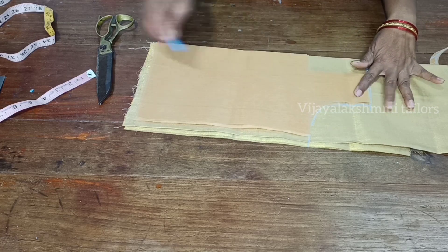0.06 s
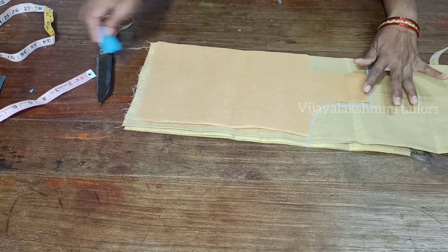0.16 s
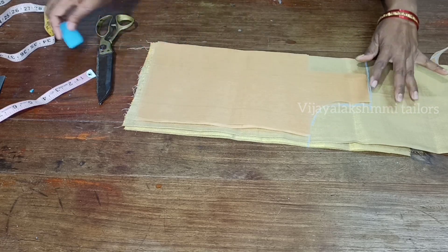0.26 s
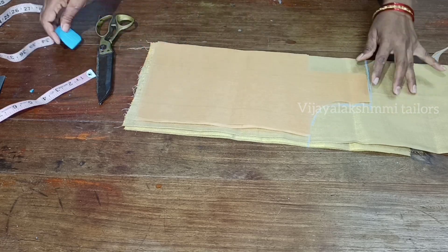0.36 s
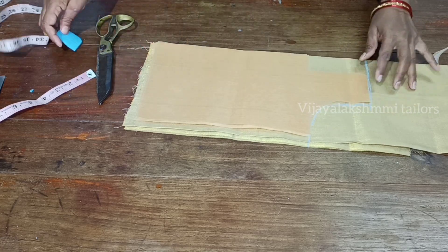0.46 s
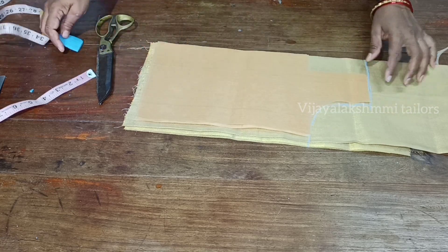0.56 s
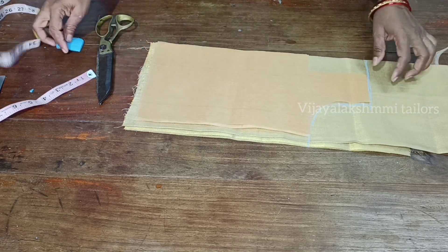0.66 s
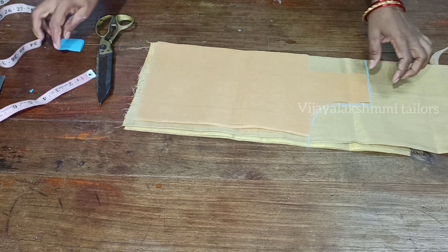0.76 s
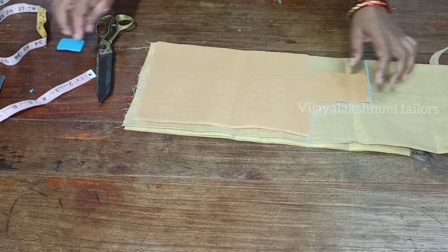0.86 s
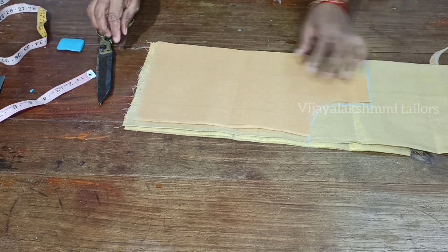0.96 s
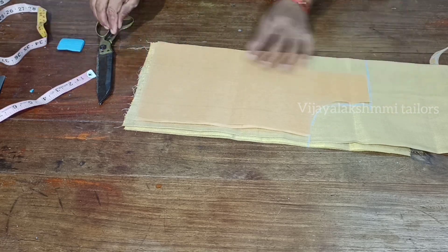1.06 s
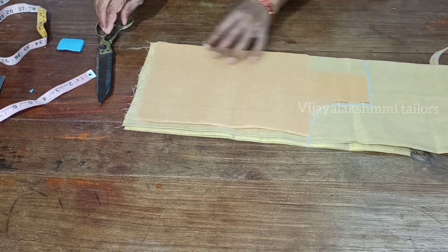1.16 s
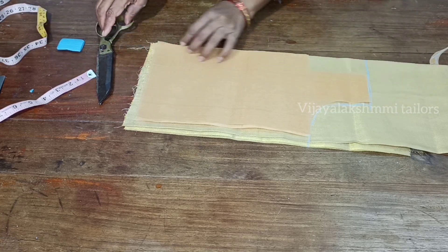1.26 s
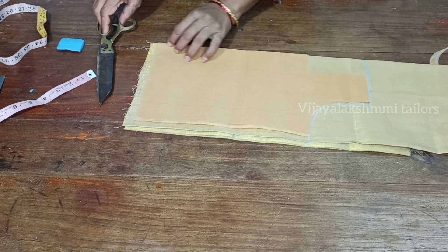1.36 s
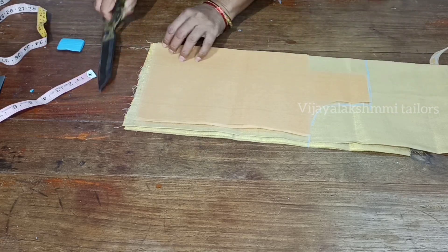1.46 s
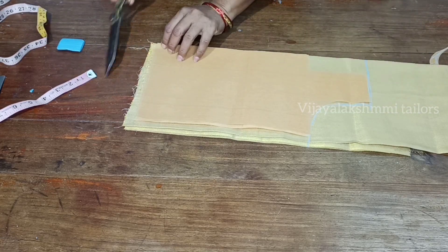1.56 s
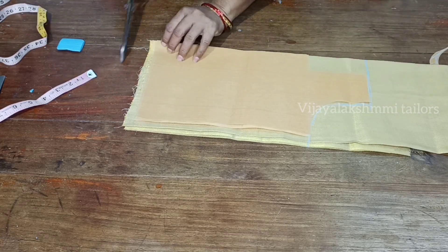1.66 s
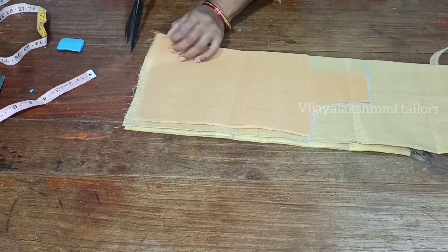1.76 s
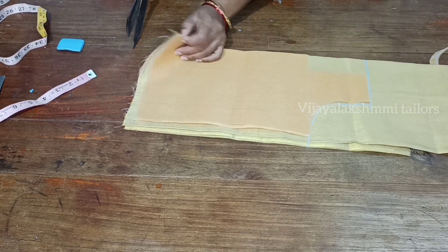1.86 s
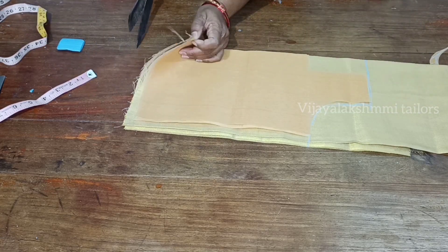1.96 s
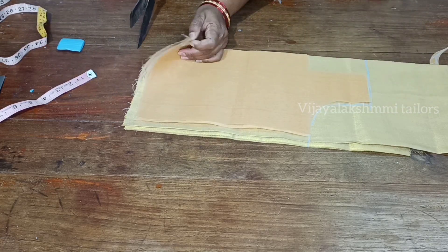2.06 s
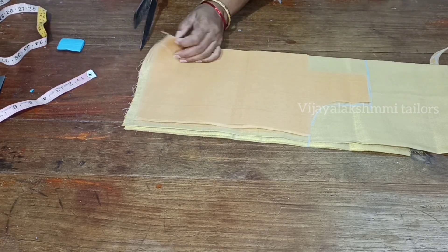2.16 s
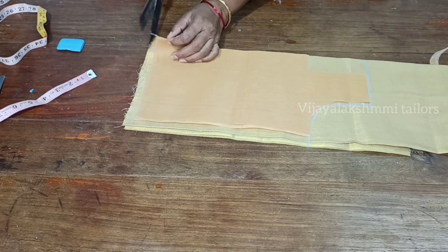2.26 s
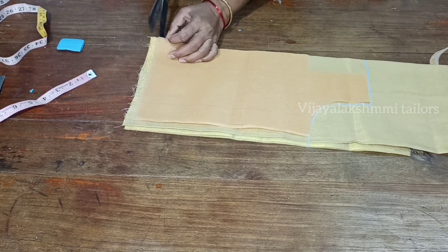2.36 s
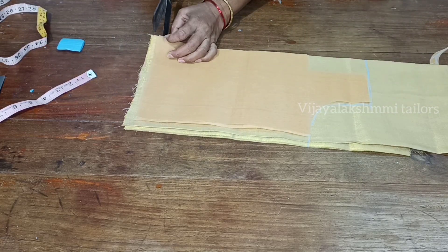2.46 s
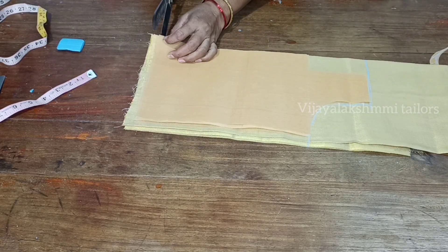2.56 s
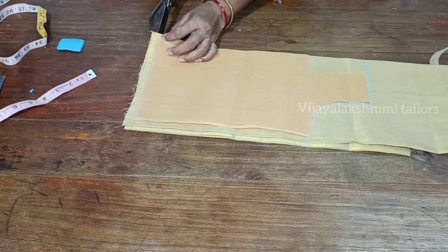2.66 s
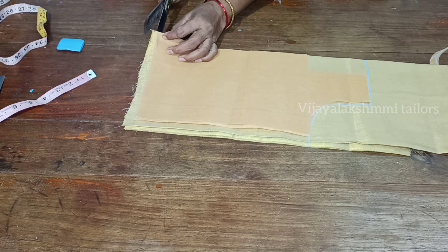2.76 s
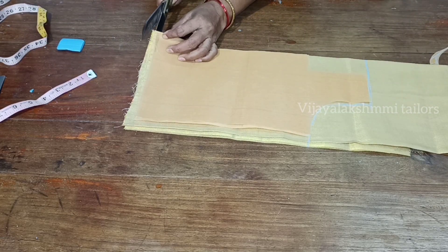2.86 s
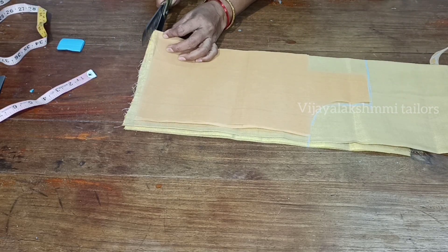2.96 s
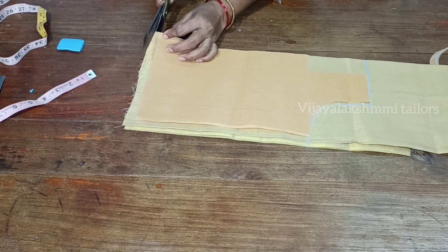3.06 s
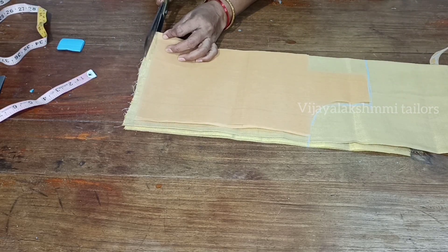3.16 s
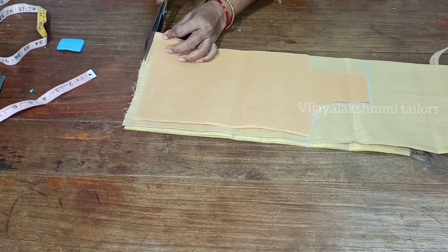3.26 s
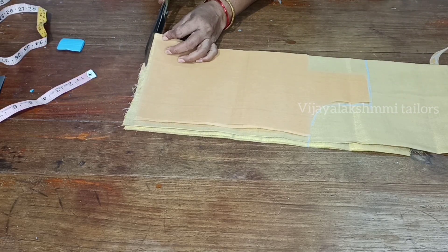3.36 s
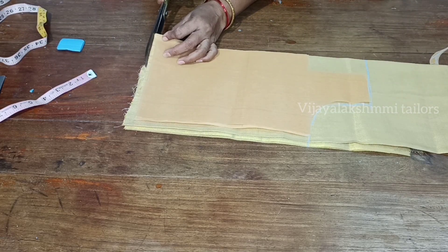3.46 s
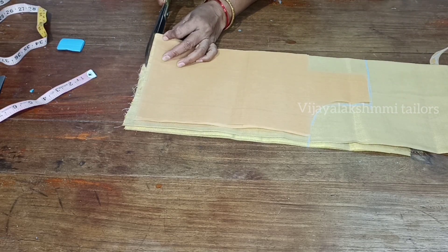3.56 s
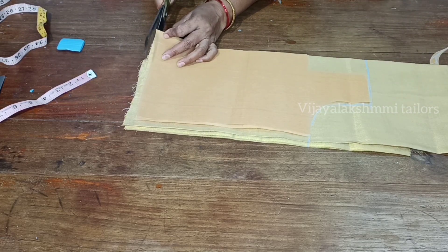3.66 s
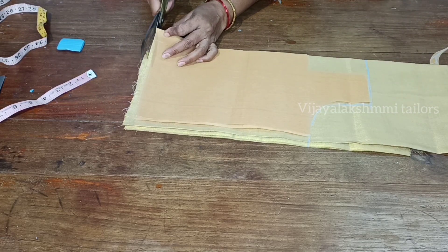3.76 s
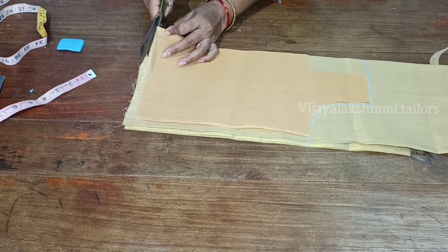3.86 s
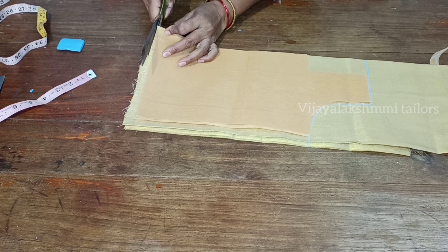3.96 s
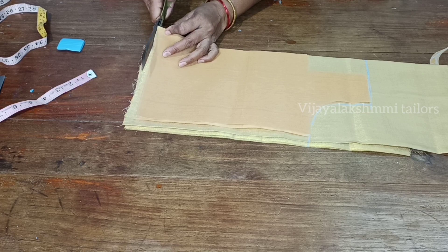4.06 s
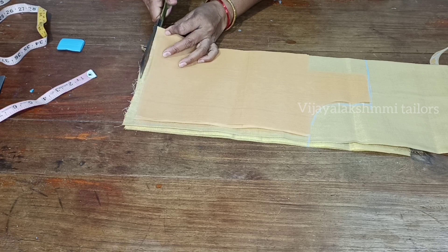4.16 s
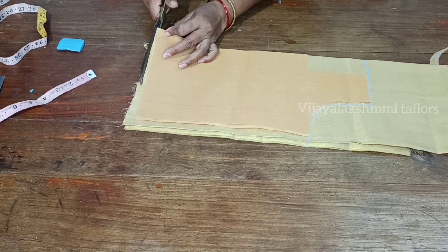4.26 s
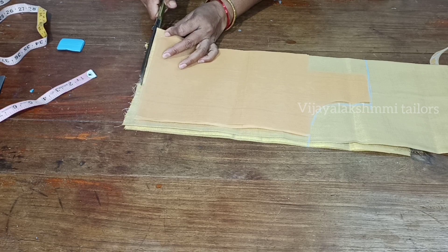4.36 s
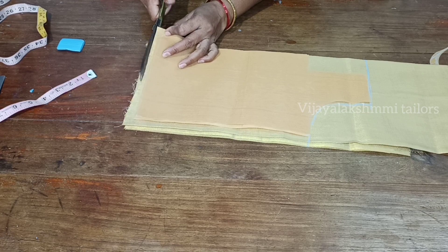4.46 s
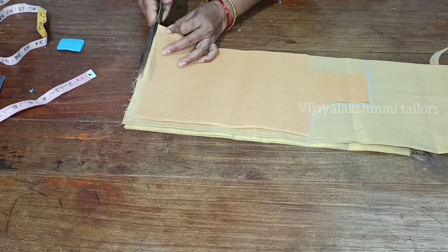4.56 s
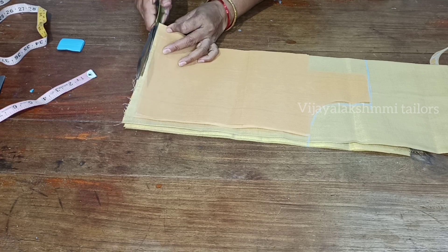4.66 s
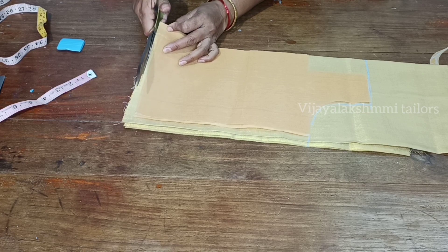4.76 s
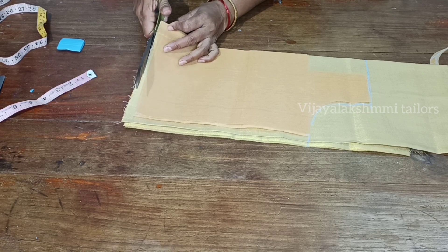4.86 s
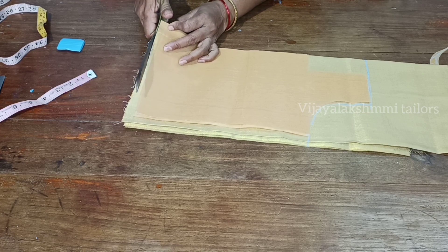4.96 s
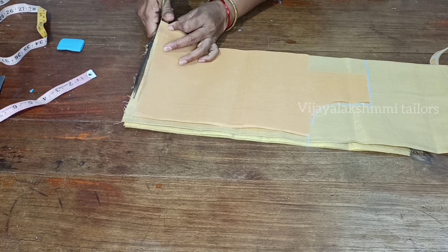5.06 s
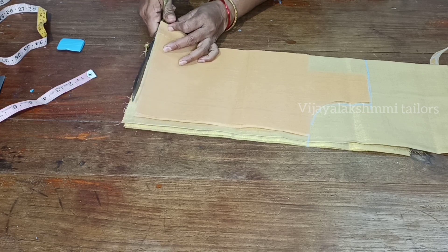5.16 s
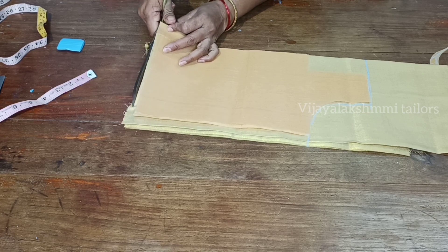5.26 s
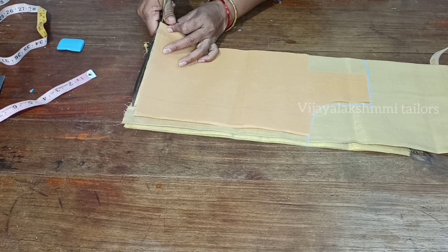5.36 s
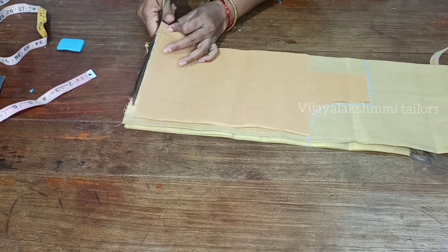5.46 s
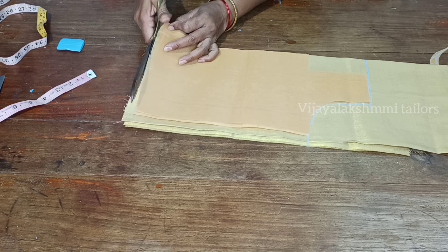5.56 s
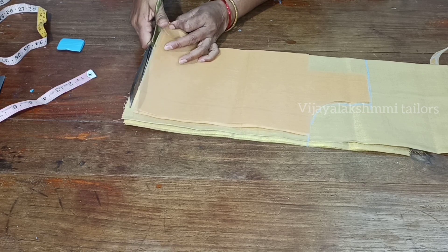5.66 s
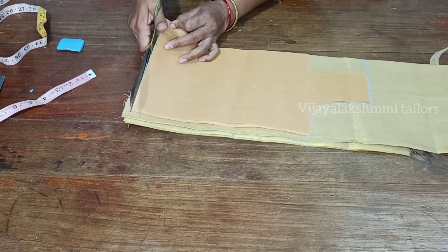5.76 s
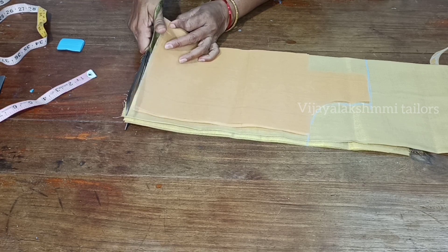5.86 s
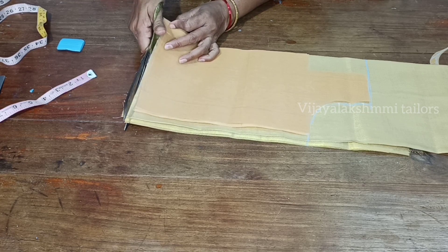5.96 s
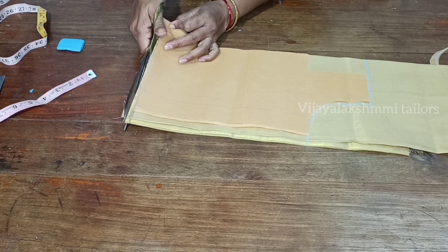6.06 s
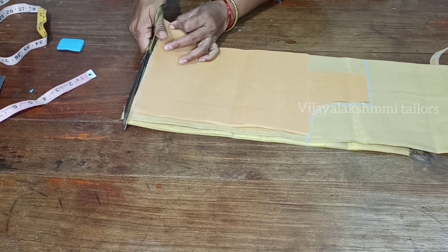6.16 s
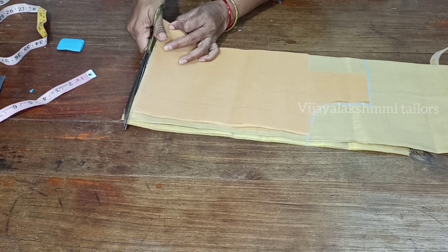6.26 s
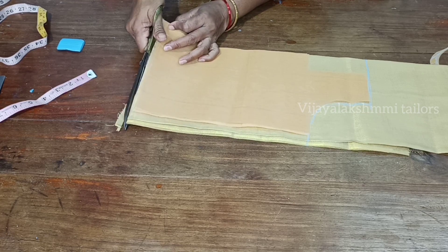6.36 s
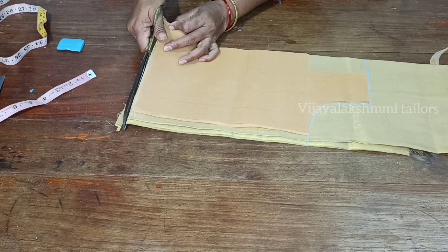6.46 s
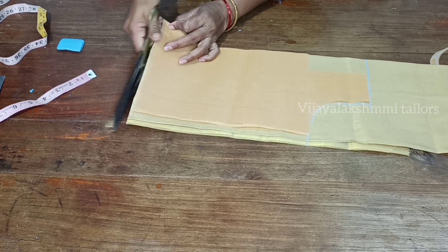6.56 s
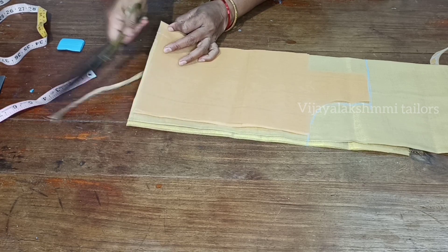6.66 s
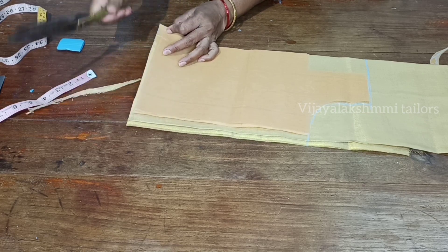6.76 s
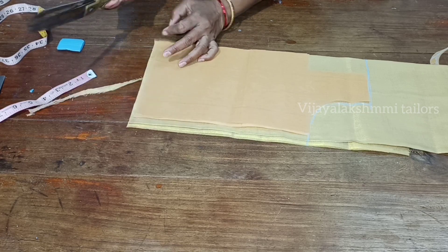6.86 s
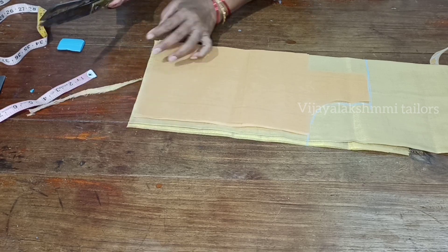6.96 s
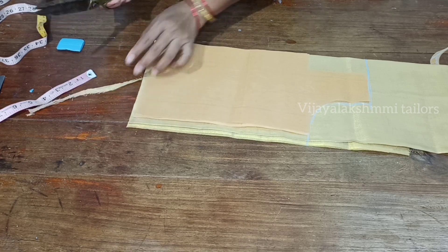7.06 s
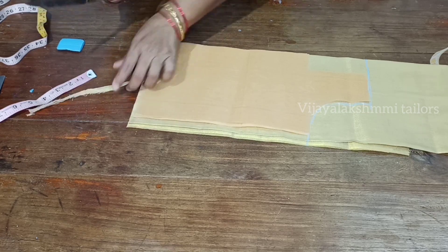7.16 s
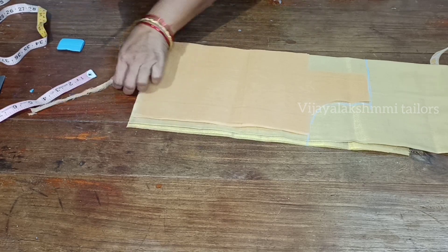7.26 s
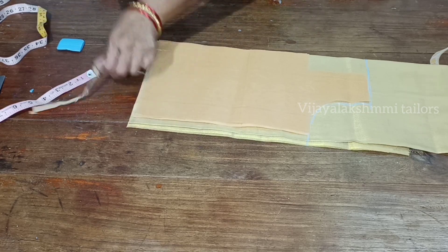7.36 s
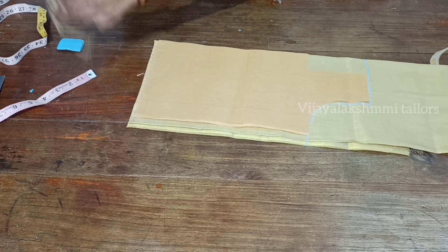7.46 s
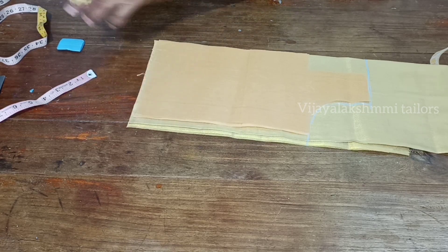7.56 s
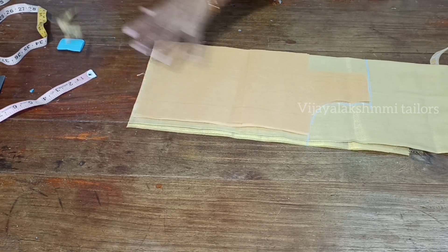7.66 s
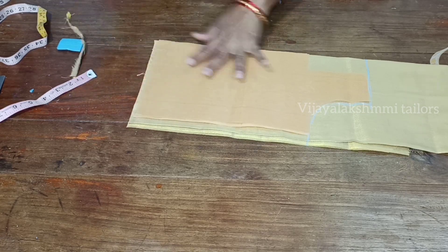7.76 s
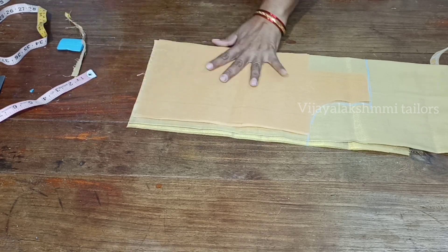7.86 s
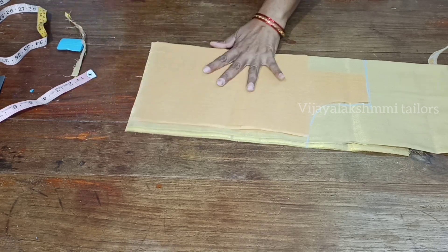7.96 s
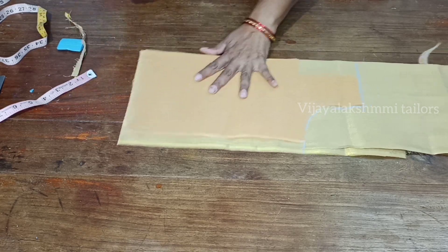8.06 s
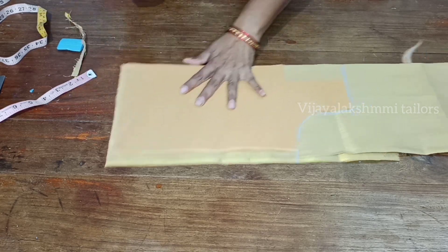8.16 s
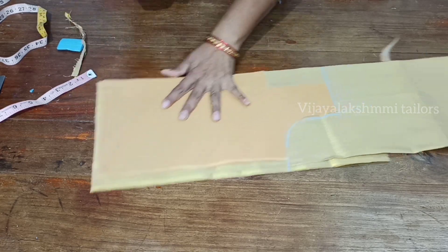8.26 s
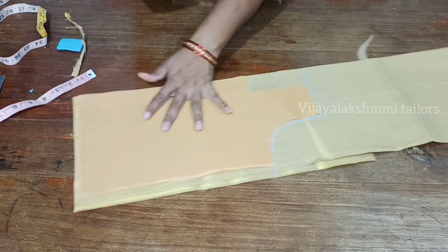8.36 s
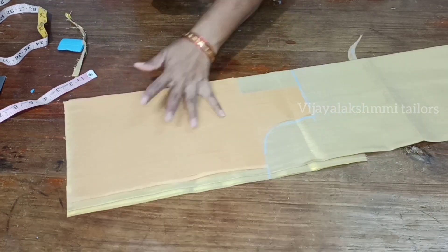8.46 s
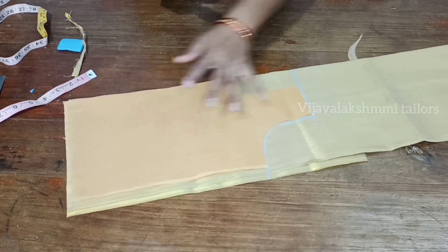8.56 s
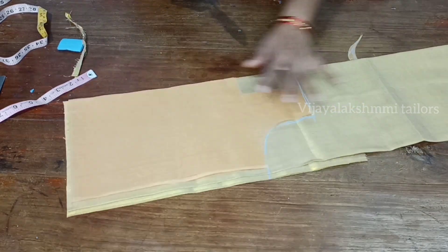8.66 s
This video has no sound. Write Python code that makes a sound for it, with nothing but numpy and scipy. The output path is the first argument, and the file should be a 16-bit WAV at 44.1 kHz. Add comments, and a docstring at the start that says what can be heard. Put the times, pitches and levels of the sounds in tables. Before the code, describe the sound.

Close to a small microphone in a nearly silent room, chalk drops on a wooden table with a hard clack. Heavy shears scrape and knock while glass bangles clink. Four slow, jerky cuts crunch through layered cloth, separated by short wooden scrapes and bangle ticks. The last ends in a loud snap, followed by jingling bangles, light brushing and fabric dragged over the table.

```python
"""A wooden table in a nearly silent room, heavy shears at work close to a small microphone. The shears scrape
along the top, bite through folded cloth in jerks and knock the wood, which carries most of the sound: grainy
noise drives the modes of the table and the boom of its panel. Glass bangles clink and chatter on both wrists
as mode banks struck by tiny touches. Cloth hisses, bright clicks tick, blades sing: noise under level curves."""
import sys
import numpy as np
from scipy import signal
from scipy.fft import rfft, irfft, next_fast_len
from scipy.io import wavfile
from scipy.ndimage import uniform_filter1d, map_coordinates

SR = 44100
rng = np.random.default_rng(int(sys.argv[2]) if len(sys.argv) > 2 else 0)


def master_out(mix):
    """Clip the mix to full scale and print it as 16-bit PCM to the path in sys.argv[1]."""
    frames = np.transpose(np.atleast_2d(mix))
    ceiling = np.clip(frames, -1, 1)
    pcm = np.round(ceiling * 32767).astype(np.int16)
    wavfile.write(sys.argv[1], SR, pcm)


N = 384111


def amp(db):
    """dB to amplitude."""
    return 10 ** (np.asarray(db) / 20)


def unit(x):
    """Scales to an RMS of 1."""
    return x / np.sqrt(np.mean(x ** 2) + 1e-20)


def along(points, hz):
    """Interpolates (f/Hz, value) points on a log frequency axis."""
    f, v = np.transpose(points)
    return np.interp(np.log(hz + 1), np.log(f + 1), v)


def curves(rows):
    """One dB value per sample for each column after the time; -150 dB outside the rows."""
    s, *cols = np.transpose(rows)
    return [np.interp(np.arange(N) / SR, s, c, -150, -150) for c in cols]


def filtered(x, response):
    """Multiplies the spectrum of x by a response of frequency."""
    m = next_fast_len(len(x) + 4096)
    return irfft(rfft(x, m) * response(np.fft.rfftfreq(m, 1 / SR)), m)[:len(x)]


def colour(spectrum):
    """Turns (f/Hz, level/dB) points into a response."""
    return lambda hz: amp(along(spectrum, hz))


def grit(spread_db, grain_s, count=N):
    """Noise made of short grains of uneven size."""
    knots = rng.standard_normal(int(count / SR / grain_s) + 4)
    swell = map_coordinates(knots, [np.arange(count) / SR / grain_s])
    return amp(spread_db * swell) * rng.standard_normal(count)


def patchy(x, patchy_db, size):
    """Random islands of gain over time and frequency, as the point of contact wanders; RMS 1."""
    z = signal.stft(x, nperseg=size)[2]
    field = uniform_filter1d(uniform_filter1d(rng.standard_normal(z.shape), 5, 0), 9, 1)
    return unit(signal.istft(z * amp(patchy_db * unit(field)), nperseg=size)[1][:N])


def add(track, s, sound):
    """Lays a sound into the track at s seconds."""
    part = track[round(s * SR):][:len(sound)]
    part += sound[:len(part)]


# room between the moves: f/Hz, level/dB
QUIET_SPECTRUM = [(25, -18.5), (50, -6.5), (123, -1.5), (206, -11), (1700, -25), (2480, -26), (4250, -30.5),
                  (16000, -33)]
QUIET_RMS_DB = -75


def quiet():
    """Faint, slowly wavering noise, strongest in the bass."""
    return amp(QUIET_RMS_DB) * unit(filtered(grit(spread_db=1.0, grain_s=0.23), colour(QUIET_SPECTRUM)))


# sway of the whole table under the cutting hand: t/s, level/dB
SWAY_LEVELS = [(3.1, -83), (3.43, -59.5), (3.88, -68.5), (4.05, -102), (4.4, -55.5), (5.05, -78),
               (5.33, -43), (5.45, -48.5), (5.83, -59.5), (5.89, -92), (6.3, -53), (6.69, -51), (6.96, -81),
               (7.35, -57), (7.5, -76)]
# deep colour of the sway: f/Hz, level/dB
SWAY_SPECTRUM = [(20, -37), (40, -12), (55, 1), (75, -4), (120, -57.5)]


def sway():
    """The table frame rocks slowly: deep noise under a level curve."""
    return amp(curves(SWAY_LEVELS)[0]) * unit(filtered(rng.standard_normal(N), colour(SWAY_SPECTRUM)))


# one mode of table or steel sings while something drags: start/s, stop/s, f/Hz, level/dB
HUM_EVENTS = [(1.48, 1.745, 166.6, -41.5), (1.496, 1.6, 2107, -44.5), (1.5, 1.72, 994, -37.5),
              (1.605, 1.67, 2386, -44), (1.76, 1.847, 594, -43.5), (1.85, 1.923, 1777, -46),
              (1.85, 1.92, 940, -40), (2.248, 2.35, 2135, -58), (2.28, 2.4, 1242, -55),
              (2.415, 2.523, 682, -45.5), (3.65, 3.852, 963, -43), (4.552, 4.803, 1018, -43),
              (5.54, 5.81, 937, -40.5), (7.798, 7.856, 686, -62.5), (7.949, 8.035, 1420, -40),
              (7.946, 8.016, 2456, -45.5), (8.411, 8.533, 235.5, -46.5)]
HUM_HALF_WIDTH_RATIO, HUM_EDGE_S, HUM_SAG_DB = .06, 0.034, -4.5  # half width over pitch; sag start to stop


def hums():
    """Dragging excites single modes: narrow noise, sagging until the drag stops."""
    out = np.zeros(N)
    for start, stop, hz, db in HUM_EVENTS:
        edges = [(start - HUM_EDGE_S / 8, db - 18), (start, db),
                 (stop, db + HUM_SAG_DB), (stop + HUM_EDGE_S, db - 26.5)]
        level = amp(curves(edges)[0])
        mode = lambda f: 1 / (1 + ((f - hz) / (HUM_HALF_WIDTH_RATIO * hz)) ** 2)
        out += level * unit(filtered(rng.standard_normal(N), mode))
    return out


# short bright clicks (threads, grit, sharp edges of clinks and hits): t/s, level/dB
CLICK_EVENTS = [(.574, -66), (1.4966, -41.5), (2.431, -57), (3.4064, -39.5), (3.4509, -40), (3.4865, -41.5),
                (4.2379, -62), (4.351, -41), (4.392, -40), (4.9363, -62), (5.1254, -57), (5.3563, -33.5),
                (5.465, -60.5), (6.378, -29.5), (6.6659, -57), (7.254, -45), (7.6855, -53), (7.733, -38.5),
                (7.9459, -50)]
# bright colour of clicks and fibre crunches: f/Hz, level/dB
BRIGHT_SPECTRUM = [(2200, -9.5), (3000, -12), (4500, -13), (7000, 2.5), (12500, -3.5), (16000, -17.5)]
CLICK_RISE_S, CLICK_T60_S = 0.00084, 0.0088


def clicks():
    """Threads, grit and sharp edges of clinks and hits: bright noise swells for a moment and is gone."""
    level, t = np.zeros(N), np.arange(SR // 30) / SR - 4 * CLICK_RISE_S
    for s, db in CLICK_EVENTS:
        rise = np.exp(np.minimum(t, 0) / CLICK_RISE_S)
        add(level, s + t[0], amp(db - 60 * np.maximum(t, 0) / CLICK_T60_S) * rise)
    return level * unit(filtered(rng.standard_normal(N), colour(BRIGHT_SPECTRUM)))


JOSTLE_RAD, JOSTLE_STEP = .65, 105  # neighbours blur the pitch: random phase step, every so many samples


def chime(modes_hz, modes, touches, scatter_db, damped_s):
    """Touches ring every bangle mode at a new strength, until skin and neighbours damp it."""
    t = np.arange(SR // 4) / SR
    db, t60 = np.transpose(modes)[:, :, None]
    luck = rng.standard_normal((3, *db.shape))
    hz = np.c_[modes_hz] * (1 + 0.0023 * luck[0])  # like bangles differ slightly in pitch
    beat_hz = 35 * np.exp(0.56 * luck[2])
    beat = 1 + 0.62 * np.cos(2 * np.pi * beat_hz * t)  # oval rings split each mode in two
    steps = JOSTLE_RAD * rng.standard_normal((len(db), len(t) // JOSTLE_STEP)).cumsum(1)
    jostle = uniform_filter1d(steps.repeat(JOSTLE_STEP, 1), JOSTLE_STEP)
    decay = amp(db + scatter_db * luck[1] - 60 * t / t60 - 60 * t / damped_s)
    ring = decay * beat * np.sin(2 * np.pi * hz * t + jostle)
    return signal.fftconvolve(touches, ring.sum(0))


# bangles touching: t/s, relative levels of tick/dB, thick pair/dB, thin pair/dB
CLINK_EVENTS = [(0.0683, -43.5, -71, -62.5), (0.093, -38, -62.5, -75), (0.9882, -44.5, -79.5, -89),
                (1.272, -41, -64.5, -80), (1.3474, -44, -70, -44), (1.421, -49, -61, -59),
                (1.5826, -33, -53, -67), (1.7628, -34.5, -57, -59.5), (1.8428, -22, -56, -49.5),
                (1.938, -40.5, -73.5, -54), (1.965, -43.5, -73.5, -49.5), (2.0377, -38, -62, -53.5),
                (2.1211, -37.5, -60, -53), (2.2273, -40.5, -77, -55), (3.045, -62, -79, -100.5),
                (3.9051, -29, -58.5, -77), (4.802, -21.5, -48.5, -57.5), (4.931, -54, -78, -89),
                (5.7893, -26.5, -56.5, -61.5), (6.7395, -23.5, -52.5, -87.5), (6.9936, -27, -58.5, -54.5),
                (7.1009, -51, -73.5, -50.5), (7.1095, -42, -57.5, -40), (7.2524, -35, -66, -48),
                (7.3015, -33.5, -63.5, -39.5), (7.3353, -29.5, -60.5, -40.5), (7.3614, -22, -65.5, -45.5),
                (7.4844, -31, -55.5, -52), (7.5441, -39, -57.5, -49.5), (7.5623, -31, -52.5, -62.5),
                (7.6028, -34, -75.5, -55.5), (7.683, -43.5, -89, -67), (7.6993, -41.5, -77.5, -57.5),
                (7.7302, -23.5, -56, -48), (8.317, -35, -67.5, -44.5), (8.397, -37, -70.5, -50.5),
                (8.4815, -23, -58, -47)]
# touches with a stronger lowest ring of the thick pair: t/s
STRONG_LOW_S = [.0695, 1.272, 6.9936, 7.1095]
# modes of the thick pair: f/Hz
THICK_MODES_HZ = [4100, 6515, 9480, 12830, 15140]
# the same modes: level/dB, t60/s
THICK_MODES = [(-21, 0.2), (-6, 0.13), (-3, .06), (-3.5, 0.19), (-8, .08)]
# modes of the thin pair: f/Hz
THIN_MODES_HZ = [1700, 3612, 4856, 6385, 7978, 8339, 8500, 9275, 12530, 13430, 14810]
# the same modes: level/dB, t60/s
THIN_MODES = [(-20, 0.33), (-26, 0.49), (-18.5, 0.3), (-7.5, 0.55), (-16, 0.15), (0.5, .1), (2, 0.078),
              (-2.5, 0.78), (-2.5, 0.1), (-0.5, 0.1), (-9, .15)]
# glassy rustle: f/Hz, level/dB
GLASS_SPECTRUM = [(2500, -40), (4000, -11), (6000, -8.5), (9000, 3), (11000, -3), (13500, -5),
                  (16000, -8.5)]
# runs of bangles rolling against each other: t/s, relative level/dB
CHATTER_RUNS = [
    [(1.345, -59), (1.47, -74), (1.62, -65), (1.75, -76), (1.82, -63), (1.95, -57), (2.03, -71.5),
     (2.12, -57.5), (2.2, -77.5), (2.26, -66), (2.33, -93.5)],
    [(7.252, -58.5), (7.3, -53), (7.37, -51.5), (7.42, -80.5)],
    [(7.485, -62.5), (7.6, -66.5), (7.66, -84)],
    [(7.945, -56), (8.08, -64.5), (8.25, -52.5), (8.38, -58.5), (8.491, -50.5), (8.58, -100)],
]
STRONG_LOW_DB = 14
CLINK_T60_S, FREE_RING = 0.22, 0.42  # t60 where ring equals tick; dB of t60 per dB of ring over tick


def bangles():
    """Glass touches glass: short rattles ring two sets of modes, with a rustle and a rolling chatter."""
    out, ticks, t = np.zeros(N), np.zeros(N), np.arange(SR // 8) / SR
    rise = 1 - np.exp(-t / 0.0061)
    for s, tick_db, thick_db, thin_db in CLINK_EVENTS:
        t60 = CLINK_T60_S * amp(FREE_RING * (max(thick_db, thin_db) - tick_db))
        touches = rise * amp(-60 * t / (0.33 * t60)) * grit(spread_db=5.5, grain_s=0.0012, count=len(t))
        touches = touches / np.linalg.norm(touches)
        low_db, low_t60 = THICK_MODES[0]
        thick = [(low_db + STRONG_LOW_DB * (s in STRONG_LOW_S), low_t60), *THICK_MODES[1:]]
        thick_ring = chime(THICK_MODES_HZ, thick, touches, scatter_db=2.0, damped_s=5.6 * t60)
        thin_ring = chime(THIN_MODES_HZ, THIN_MODES, touches, scatter_db=5.0, damped_s=2.0 * t60)
        add(out, s, amp(thick_db + 11.0) * thick_ring)
        add(out, s, amp(thin_db) * thin_ring)
        tail = amp(-15 - 60 * t / 0.19) * (1 - t / t[-1])
        snap = amp(-8 - 60 * t / 0.0052)
        add(ticks, s, amp(tick_db - 10.0) * (rise * (amp(-60 * t / (0.2 * t60)) + tail) + snap))
    level = sum(amp(curves(rows)[0]) for rows in CHATTER_RUNS)
    touches = grit(spread_db=3.5, grain_s=0.0018)
    rolling = chime(THIN_MODES_HZ, THIN_MODES, touches, scatter_db=1, damped_s=0.74)[:N]
    chatter = amp(7.0) * level * patchy(rolling, patchy_db=4.5, size=512)
    rustle = filtered(grit(spread_db=2.5, grain_s=0.002), colour(GLASS_SPECTRUM))
    glass = (ticks + amp(-11.5) * level) * patchy(rustle, patchy_db=2.5, size=256)
    return out + chatter + glass


# steel of the shears: f/Hz, half width/Hz, level/dB
BLADE_MODES = [(4140, 200, -0.5), (7000, 240, -5), (9200, 270, -6)]
BLADE_OVER_BOOM_DB = -30.5


def blades():
    """Rubbing edges make the steel sing faintly, following the boom that grows toward the tips."""
    level = sum(amp(curves(cut(*row))[1] + BLADE_OVER_BOOM_DB) for row in CUT_EVENTS)
    steel = lambda f: sum(amp(db) / (1 + ((f - hz) / width) ** 2) for hz, width, db in BLADE_MODES)
    return level * patchy(filtered(grit(spread_db=4.5, grain_s=0.0089), steel), patchy_db=2.5, size=512)


# blades close through cloth: first bite/s, full effort/s, stop/s, fade/s, rasp at stop/dB, boom at stop/dB
CUT_EVENTS = [(3.12, 3.271, 3.5, 0.22, -31.5, -31), (4.058, 4.174, 4.37, 0.37, -34, -33.5),
              (4.981, 5.127, 5.396, 0.3, -32, -33.5), (5.98, 6.17, 6.3, 0.35, -30, -29.5)]
BITE_DB, EARLY_DB, BOOM_EARLY_DB = -44.5, -3, -9.5  # first bite and full effort over the level at stop
CUT_FADE_DB, BOOM_FADE_DB, HISS_FADE_DB = -50, -29, -28  # end of fade; loose fibres rustle on
CUT_HISS_DB = -31.5  # over rasp


def cut(bite, full, stop, fade, rasp, boom):
    """Effort builds, the boom keeps growing toward the blade tips, then all fades."""
    rasps = rasp + np.array([BITE_DB, EARLY_DB, 0, CUT_FADE_DB])
    booms = boom + np.array([BITE_DB, BOOM_EARLY_DB, 0, BOOM_FADE_DB])
    hisses = rasp + CUT_HISS_DB + np.array([BITE_DB, EARLY_DB, 0, HISS_FADE_DB])
    return np.c_[[bite, full, stop, stop + fade], rasps, booms, hisses]


PUSH_RISE_S, PUSH_STOP_S, PUSH_EDGE_DB, PUSH_HISS_DB = 0.059, 0.1, -14.5, -22  # hiss over rasp


def push(start, stop, first, last, boom):
    """The shears slide on along the table: quick start, slackening slide, abrupt stop."""
    rasps = np.array([first + PUSH_EDGE_DB, first, last, last + 2 * PUSH_EDGE_DB])
    times = [start, start + PUSH_RISE_S, stop, stop + PUSH_STOP_S]
    return np.c_[times, rasps, rasps + boom, rasps + PUSH_HISS_DB]


SLAM_RISE_S, SLAM_BOOM_DB, SLAM_HISS_DB = 0.028, -11, -25  # boom and hiss over rasp


def slam(s, db, t60):
    """The struck table rumbles on and dies away evenly."""
    rasps = db + np.array([-20, 0, -60])
    return np.c_[[s, s + SLAM_RISE_S, s + t60], rasps, rasps + SLAM_BOOM_DB, rasps + SLAM_HISS_DB]


# table modes: f/Hz
BOARD_MODES_HZ = [400, 525, 640, 732, 840, 890, 1032, 1072, 1180, 1295, 1480, 1618, 1750, 1917, 2050, 2370]
# their strengths: level/dB
BOARD_MODES_DB = [6.5, 6.5, 7.5, 1.5, -8, 1.5, 6, 2.5, 6, 7.5, 5, 5.5, 4, 1, 3.5, 7.5]
# broad colour of the table top: f/Hz, level/dB
WOOD_SPECTRUM = [(150, -41), (250, -10.5), (812, -2.5), (1060, -5.5), (1360, -9), (2000, -7.5),
                 (2920, -28.5), (5000, -36.5), (6500, -63), (11000, -120)]
BOARD_WIDTH_HZ = 33


def wood(hz, share=0):
    """Broad colour of the table top and its resonant modes, each excited by its own share in dB."""
    half = 1j * BOARD_WIDTH_HZ / 2
    lift = amp(np.c_[BOARD_MODES_DB] + share) * half / (np.c_[BOARD_MODES_HZ] - hz + half)
    return amp(along(WOOD_SPECTRUM, hz)) * (1 + lift.sum(0))


# shears reopen and push on: start/s, stop/s, rasp at start/dB, rasp at stop/dB, boom over rasp/dB
PUSH_EVENTS = [(3.63, 3.932, -41, -56.5, -13), (4.562, 4.854, -42, -44.5, -16),
               (5.542, 5.826, -40.5, -48.5, -16.5), (6.61, 6.747, -35, -48, -3)]
# chalk dropped, blades snapping shut: t/s, rasp/dB, t60/s
SLAM_EVENTS = [(.75, -29.5, 0.64), (6.378, -23, 0.38)]
# hands, shears and cloth moving on the table, in runs: t/s, wood rasp/dB, table boom/dB, cloth hiss/dB
HANDLING_RUNS = [
    [(.06, -86, -80, -99), (.08, -71, -71, -71), (.14, -71.5, -65, -74.5), (.2, -95, -91, -82)],
    [(.43, -87, -90, -78), (.52, -73, -76, -80), (.55, -52, -61, -72), (.62, -74, -62, -78),
     (.71, -70, -81, -90), (.745, -48, -51, -70)],
    [(1.26, -91, -86, -96), (1.29, -76, -72, -75), (1.328, -70, -63, -96), (1.36, -47, -45.5, -51.5),
     (1.44, -37, -42.5, -65), (1.485, -46, -45, -74), (1.52, -36.5, -47, -61), (1.7, -40.5, -49, -58.5),
     (1.745, -45.5, -49, -63), (1.88, -38, -54, -52), (2.02, -49, -54, -74), (2.19, -59.5, -65, -71)],
    [(2.19, -64, -64, -70), (2.35, -46, -59, -64.5), (2.41, -55, -60, -73.5), (2.47, -47.5, -58.5, -67),
     (2.62, -66.5, -73, -82), (2.92, -69, -90, -87), (3.12, -85, -79, -99)],
    [(6.82, -80.5, -68.5, -90), (7.09, -63.5, -66.5, -76), (7.25, -67, -62, -80), (7.31, -46.5, -40, -60.5),
     (7.44, -71, -62.5, -79.5), (7.7, -71, -61.5, -78), (7.82, -69, -67.5, -77.5), (7.93, -89, -75, -106)],
    [(7.93, -91, -66, -91), (7.99, -45, -46, -59), (8.06, -48, -46.5, -63), (8.14, -47, -50.5, -68.5),
     (8.3, -34, -48, -52.5), (8.43, -37, -59, -58), (8.49, -45, -55, -64), (8.6, -81.5, -74, -93),
     (8.71, -87, -86, -109)],
]
# panel boom: f/Hz, level/dB
BOOM_SPECTRUM = [(25, -33), (42, -26.5), (91, -3), (130, -4.5), (167, 1), (206, -5.5), (290, -8.5),
                 (350, -9.5), (460, -18), (770, -120)]
# cloth hiss: f/Hz, level/dB
HISS_SPECTRUM = [(1470, -24), (2500, -1.5), (3180, -10.5), (3490, -17), (6250, -20), (8080, -19.5),
                 (9360, -22), (14900, -29.5), (16000, -29.5)]


def rubbing():
    """Steel and cloth drag over the grain: a rasp in the wood modes, a boom in the panel, a hiss of fibres."""
    moves = [cut(*r) for r in CUT_EVENTS] + [push(*r) for r in PUSH_EVENTS]
    moves += [slam(*r) for r in SLAM_EVENTS] + HANDLING_RUNS
    rasp, boom, hiss = sum(amp(curves(rows)) for rows in moves)
    scrape = filtered(grit(spread_db=2.5, grain_s=.005), wood)
    panel = filtered(grit(spread_db=1.5, grain_s=.03), colour(BOOM_SPECTRUM))
    cloth = filtered(grit(spread_db=1.5, grain_s=0.001), colour(HISS_SPECTRUM))
    body = rasp * patchy(scrape, patchy_db=2.5, size=1024)
    low = boom * patchy(panel, patchy_db=3, size=2048)
    return body + low + amp(3.0) * hiss * patchy(cloth, patchy_db=3.5, size=256)


def blow(shape, top_hz):
    """A gritty push into the wood, coloured by where it lands; padded by a hundredth of a second."""
    shove = np.pad(shape * grit(spread_db=2.0, grain_s=0.0022, count=len(shape)), (SR // 100, 0))
    share = rng.normal(0, 4.1, (len(BOARD_MODES_DB), 1))
    focus = lambda hz: .5 + np.exp(-(np.log((hz + 1) / top_hz) / 0.15) ** 2)
    out = filtered(shove, lambda hz: wood(hz, share) * focus(hz))
    out = out * np.clip(np.arange(len(out)) / (SR // 200), 0, 1)
    return amp(-8.5) * out * np.linalg.norm(shape) / np.linalg.norm(out)


# chalk, steel and fingers knock the wood: t/s, relative level/dB, loudest f/Hz, crunch over it/dB, t60/s
KNOCK_EVENTS = [(0.532, -37, 820, -29, 0.078), (0.572, -36, 625, -30, 0.066),
                (0.748, -17.5, 1700, -23, 0.076), (0.761, -22.5, 2040, -33, 0.23),
                (0.796, -17.5, 1890, -42, 0.069), (1.339, -26.5, 1410, -12.5, 0.038),
                (1.373, -15, 596, -22, 0.13), (1.407, -18, 600, -24.5, 0.074),
                (1.497, -16, 1010, -24, 0.043), (1.774, -32, 650, -17.5, 0.16),
                (1.848, -20.5, 910, -9.5, 0.11), (2.282, -38, 2190, -16, 0.14),
                (2.429, -32, 620, -32, 0.35), (2.914, -44.5, 690, -29, 0.032),
                (3.645, -20.5, 1070, -28.5, 0.29), (4.56, -18.5, 1080, -30.5, 0.25),
                (4.687, -26.5, 1020, -51, 0.29), (5.56, -22.5, 940, -26.5, 0.14),
                (6.375, -0.5, 1750, -33, 0.051), (6.397, -14, 1610, -45, 0.085),
                (6.644, -21, 573, -47, 0.23), (7.282, -29, 494, -9.5, 0.051),
                (7.943, -25, 1455, -26, 0.019), (7.966, -25.5, 1450, -27, 0.04)]
# blades jerk through the layers: t/s, relative level/dB, loudest f/Hz, crunch over it/dB
JERK_EVENTS = [(3.184, -34.5, 2120, -22.5), (3.225, -29.5, 1350, -19.5), (3.271, -18.5, 1150, -20),
               (3.307, -14.5, 1060, -22.5), (3.348, -12, 950, -23.5), (3.403, -8, 2040, -28),
               (3.444, -16.5, 1090, -24), (3.482, -18, 404, -29), (4.116, -37, 518.8, -21),
               (4.147, -31.5, 510, -16), (4.19, -21, 1330, -25), (4.259, -12.5, 586, -26.5),
               (4.3, -13.5, 1310, -26), (4.342, -12.5, 940, -22), (4.39, -21, 890, -17),
               (5.065, -33.5, 1610, -22.5), (5.121, -28, 1060, -22.5), (5.171, -16, 1080, -27.5),
               (5.214, -10.5, 1180, -29.5), (5.269, -6.5, 400, -30), (5.318, -5, 1130, -30.5),
               (5.349, -8.5, 1090, -24), (5.465, -23, 1130, -32), (5.994, -46.5, 1170, -32),
               (6.055, -37.5, 624, -26.5), (6.087, -38.5, 2060, -19), (6.138, -20.5, 375, -28),
               (6.193, -10.5, 945, -29.5), (6.231, -13, 920, -31), (6.272, -15.5, 1030, -25.5)]
# short cracks and clicks around 2.5 kHz, most from hard contacts: t/s, relative level/dB, t60/s
CRACK_EVENTS = [(0.7443, -18, 0.035), (0.761, -25.5, 0.21), (1.497, -33, .1), (2.5605, -48, 0.017),
                (2.904, -53, .02), (6.3745, -14, 0.077), (7.943, -26, .04), (7.9653, -32.5, 0.11)]
# crack colour: f/Hz, level/dB
CRACK_SPECTRUM = [(1000, -26), (2500, 7.5), (3300, -6), (4100, -11.5), (4600, -14.5), (14900, -37),
                  (16000, -40)]
CRUNCH_LEAD_S, CRUNCH_RISE_S = 0.012, 0.0086  # fibres start to tear just before the knock
JERK_RISE_S, JERK_LEAD_S, JERK_T60_S, TEAR_S = 0.0071, .003, 0.044, .007


def knocks():
    """Knocks snap and ring on in the wood, jerks swell and stop; both crunch fibres; short cracks on top."""
    out, crunch, crack, t = np.zeros(N), np.zeros(N), np.zeros(N), np.arange(SR // 4) / SR
    early = (SR // 100) / SR  # padding of blow
    rumble = amp(-12.5 - 60 * t / 0.37)
    for s, db, top_hz, crunch_db, t60 in KNOCK_EVENTS:
        decay = amp(-60 * t / t60)
        shape = amp(-2.5 - 60 * t / 0.023) + (1 - np.exp(-t / 0.0033)) * (decay + rumble)
        add(out, s - early, amp(db) * blow(shape, top_hz))
        tear = (1 - np.exp(-t / CRUNCH_RISE_S)) ** 2 * decay
        add(crunch, s - CRUNCH_LEAD_S, amp(db + crunch_db) * tear)
    burst = np.exp(-.5 * (t / TEAR_S - 2.6) ** 2)
    rustle = amp(-6 - 60 * t / 0.25) * (1 - np.exp(-t / TEAR_S))
    for s, db, top_hz, crunch_db in JERK_EVENTS:
        shape = (1 - np.exp(-t / JERK_RISE_S)) ** 2 * (amp(15.5 - 60 * t / JERK_T60_S) + rumble)
        add(out, s - early - JERK_LEAD_S, amp(db) * blow(shape, top_hz))
        add(crunch, s - 2 * TEAR_S, amp(db + crunch_db - 14.5) * (burst + rustle))
    for s, db, t60 in CRACK_EVENTS:
        add(crack, s, amp(db - 9 - 60 * t / t60))
    tearing = filtered(grit(spread_db=3, grain_s=0.001), colour(BRIGHT_SPECTRUM))
    fibres = patchy(tearing, patchy_db=4, size=256)
    return out + crunch * fibres + crack * unit(filtered(rng.standard_normal(N), colour(CRACK_SPECTRUM)))


# side over mid: f/Hz, level/dB
SIDE_OVER_MID = [(2500, -28), (4000, -6), (8000, -13), (15000, -13)]


def scene():
    """Sums all sources, then widens the treble with a phase-scrambled side signal."""
    mid = quiet() + sway() + hums() + clicks() + bangles() + blades() + rubbing() + knocks()
    hz, _, z = signal.stft(mid, SR, nperseg=256)
    turn = np.exp(2j * np.pi * rng.random(z.shape))
    side_gain = amp(along([(2000, -120)] + SIDE_OVER_MID, hz))[:, None]
    side = signal.istft(z * turn * side_gain, SR, nperseg=256)[1][:N]
    return np.array([mid + side, mid - side])


TOP_HZ = 15900


def record(dry):
    """Keeps nothing above the band limit."""
    return np.array([filtered(channel, lambda hz: hz < TOP_HZ) for channel in dry])


dry = scene()
out = record(dry)
master_out(out)
```